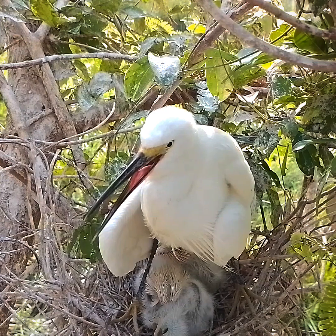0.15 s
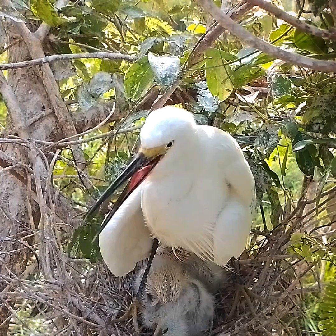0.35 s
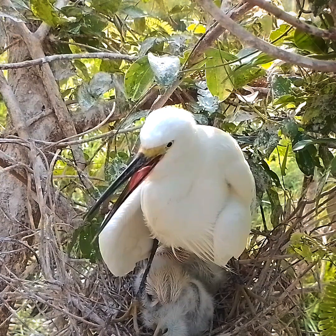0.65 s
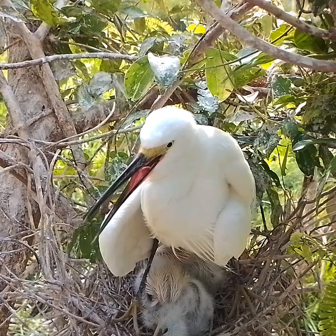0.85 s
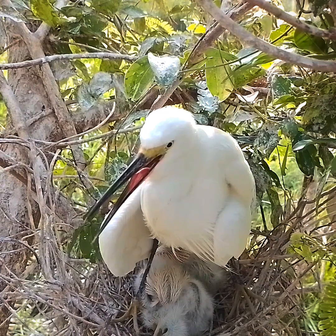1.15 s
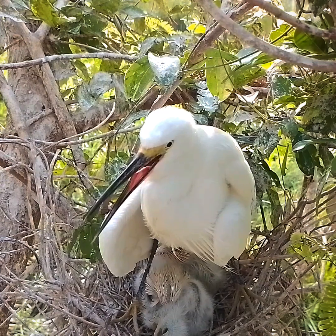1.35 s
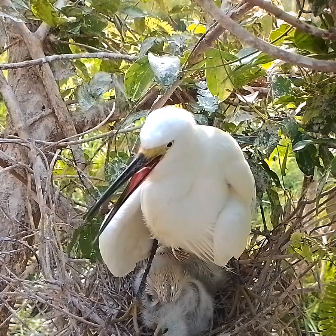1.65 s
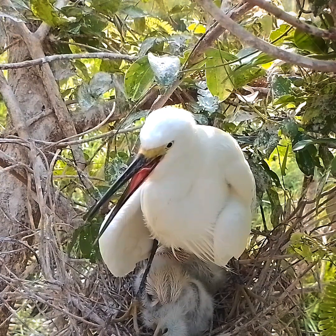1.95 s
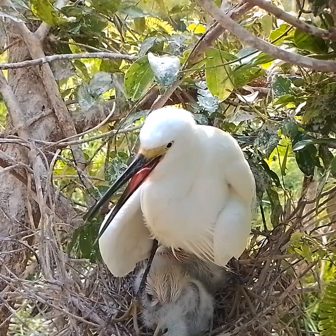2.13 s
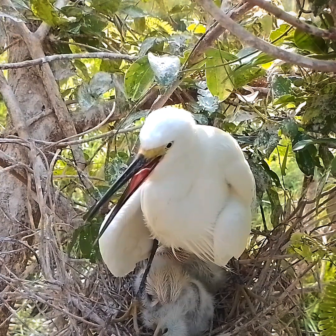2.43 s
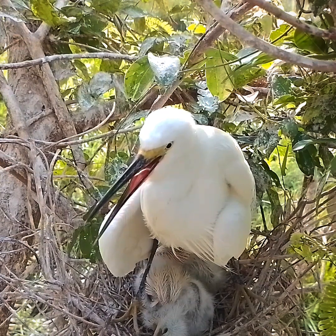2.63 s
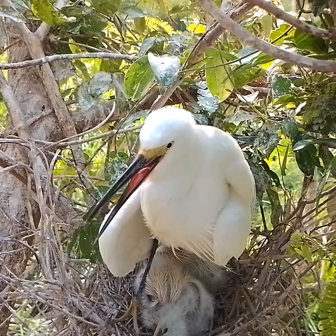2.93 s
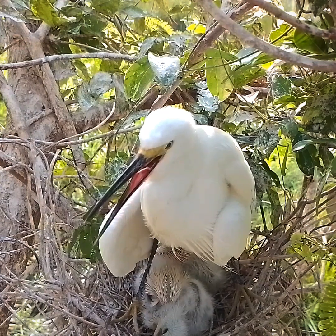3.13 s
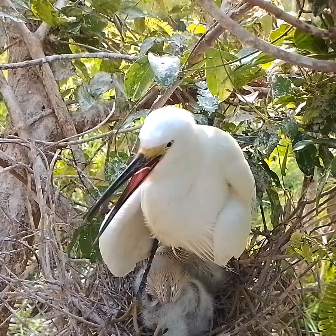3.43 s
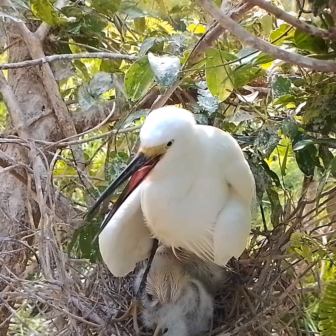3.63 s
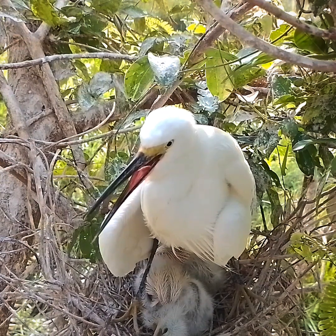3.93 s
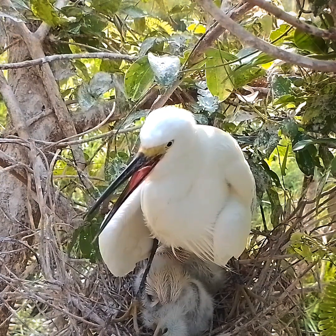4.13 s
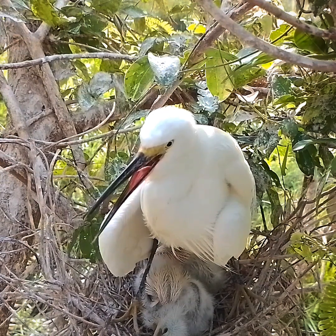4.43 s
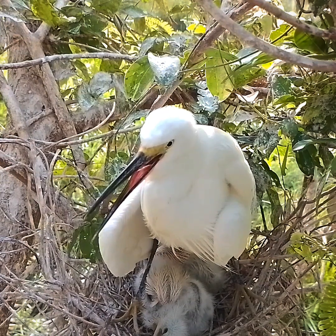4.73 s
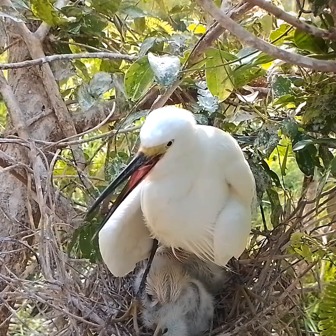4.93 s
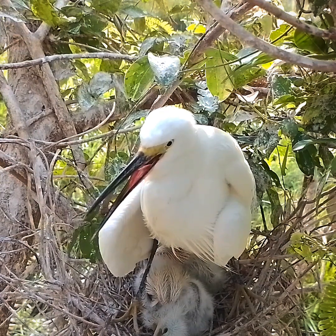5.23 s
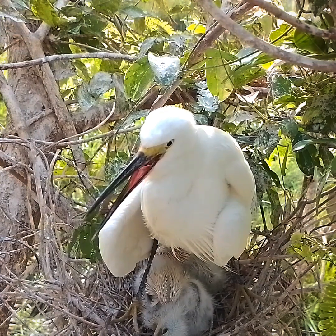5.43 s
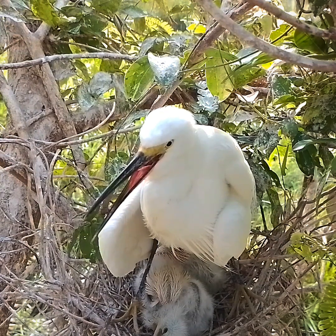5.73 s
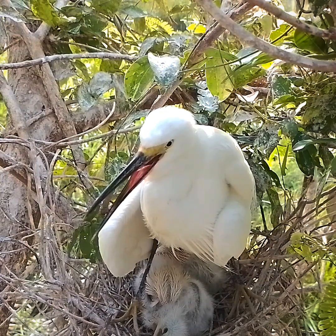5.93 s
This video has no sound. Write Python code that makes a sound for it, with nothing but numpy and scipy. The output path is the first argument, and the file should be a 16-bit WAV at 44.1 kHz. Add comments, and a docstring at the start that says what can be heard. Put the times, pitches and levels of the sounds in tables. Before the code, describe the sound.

Close to a nest in a thicket, young birds make dry clicking chips about two or three times a second, between short raspy begging screeches and puffs of hiss. A few light twig scratches come early, and small peeps and wheezes slip in. Short clucks from neighbouring birds become clearer in the second half, ending with two low croaks. Soft air in the leaves lies underneath.

```python
"""Harsh begging screeches and short ticking chips come from egret chicks in a stick nest among leaves.
Each chip is a train of membrane snaps that rings the throat and trails into a grainy hiss; puffs of
turbulent air excite throat and bill resonances in screeches and rasps. Thin wheezes, peeps and nest
scratches join in, with keks and two croaks from birds further off, over a faint wash of air.
Twigs and trees scatter the calls, and each of two microphone ports has its own treble resonance."""
import sys
import numpy as np
from scipy import signal
from scipy.fft import rfft, irfft, next_fast_len
from scipy.io import wavfile
from scipy.ndimage import uniform_filter1d, map_coordinates

SR = 44100
rng = np.random.default_rng(int(sys.argv[2]) if len(sys.argv) > 2 else 0)


def wav_out(sig):
    """Save sig, one row per channel (or a flat mono array), as 16-bit PCM at SR to the path in sys.argv[1]."""
    wavfile.write(sys.argv[1], SR, np.round(np.clip(np.atleast_2d(sig).T, -1, 1) * 32767).astype(np.int16))


N = 267951
TIME = np.arange(N) / SR
BEG_ATTACK_S, BEG_RELEASE_S = 0.0178, 0.029

# Levels in all tables are relative.
# chips and their hiss: (time [s], level [dB], treble trim [dB], hiss level [dB], hiss length [s])
CHIP_CALLS = [(0.156, -50.5, -1, -74, 0.48), (0.573, -46, 0, -50, 0.05), (0.896, -53, -5, -58, 0.16),
              (1.62, -48.5, 2, -53, 0.42), (1.981, -49, 3, -51, 0.059), (2.301, -49, 5.5, -81, 0.037),
              (2.573, -49.5, 2.5, -49.5, 0.12), (3.054, -41.5, 1.5, -44.5, 0.33),
              (3.305, -43, 6.5, -44, 0.29), (3.55, -44.5, 9.5, -47, 0.23), (4.029, -42.5, 3.5, -53.5, 0.11),
              (4.303, -42, 3.5, -55, 0.15), (4.795, -45, 2.5, -49, 0.43), (5.0767, -45.5, 7, -47, 0.11),
              (5.71, -43.5, 4, -49.5, 0.21), (5.986, -43.5, 2.5, -47, 0.12)]
# short screeches: (start [s], end [s], throat level [dB], hiss level [dB], starting resonance [Hz])
BEGGING_CALLS = [(-0.05, 0.139, -61, -55, 3002), (0.715, 0.879, -69.5, -73, 2999),
                 (1.131, 1.3, -62, -66, 3545), (1.299, 1.604, -61, -57.5, 3212),
                 (1.928, 2.065, -63.5, -59, 3037), (2.612, 2.759, -55.5, -75, 3428),
                 (2.788, 2.931, -60.5, -56, 3223), (3.018, 3.207, -58.5, -50, 2996),
                 (3.232, 3.453, -58, -44, 3416), (4.503, 4.788, -67.5, -55.5, 3106),
                 (4.957, 5.075, -64.5, -62, 3094), (5.291, 5.43, -58.5, -54, 2974),
                 (5.92, 6.105, -54, -77, 3180)]


def chips(length_s, first_db, accent_db, jitter, air, body_db, treble_db):
    """Impulse excitation: a brief train of membrane snaps rings the modes of throat and bill."""
    # lower and upper modes: (frequency [Hz], bandwidth [Hz], level [dB])
    body_modes = [(558, 35.3, 3), (990, 350, -13.5), (2145, 223, 2), (3175, 174, 5.5), (4460, 650, -3)]
    treble_modes = [(6414, 277, 1.5), (7350, 350, -2.5), (10280, 1180, -2)]
    snaps_per_s = 400
    out, size = np.zeros(N), SR // 20
    for s, db, trim_db, *_ in CHIP_CALLS:
        snap_s = np.cumsum(np.r_[0, np.exp(jitter * rng.standard_normal(15))]) / snaps_per_s
        strength = from_db(rng.uniform(-1.8, 1.8, 16)) * np.clip((length_s - snap_s) * snaps_per_s, 0, 1)
        strength[0] *= from_db(first_db)
        strength[rng.integers(2, 5)] *= from_db(accent_db)   # one snap cracks out
        snaps = np.zeros(size)
        snaps[np.minimum(snap_s * SR, size - 1).astype(int)] = strength
        drive = snaps + air * signal.lfilter([1], [1, -.97], snaps) * rng.standard_normal(size)
        # the throat differs a little from chip to chip
        modes = [(hz * np.exp(.028 * rng.standard_normal()), *rest) for hz, *rest in body_modes]
        body = from_db(body_db) * rms_one(resonate(drive, modes))
        treble = from_db(treble_db + trim_db) * rms_one(resonate(drive, treble_modes))
        start = round(s * SR)
        out[start:start + size] += (from_db(db) * (body - treble))[:N - start]
    return in_thicket(out, pan_db=4.5, twigs_db=-3)


def screeches(level_db, waver):
    """Source and filter: rattling air excites throat resonances that sag in each short call."""
    # surges of the one long screech: (time [s], level [dB], resonance [Hz])
    surges = [(0.165, -46.5, 3040), (0.204, -46, 2976), (0.336, -46, 3120), (0.375, -49, 3074),
              (0.435, -43, 2900), (0.48, -48, 2977), (0.527, -42, 2956), (0.557, -51.5, 3080)]
    # throat spectrum at rest: (frequency [Hz], level [dB])
    throat_spectrum = [(300, -46), (2400, -23), (2660, -4.5), (3200, -2), (3450, -20.5), (5600, -23.5),
                       (6400, -18), (7900, -30.5), (8800, -14), (12200, -14.5), (14000, -35.5)]
    rest_hz, sag = 2953, 0.05   # main resonance, and the share by which it falls in a call
    long_db, hz = in_time(surges)
    long_call = from_db(long_db) * held(surges[0][0], surges[-1][0], BEG_ATTACK_S, BEG_RELEASE_S)
    power = from_db(-80.5) ** 2 + long_call ** 2   # faint begging never stops
    for start, end, db, _, from_hz in BEGGING_CALLS:
        call = (from_db(db) * held(start, end, BEG_ATTACK_S, BEG_RELEASE_S)) ** 2
        hz = np.where(call > power, from_hz * np.interp(TIME, [start, end], [1, 1 - sag]), hz)
        power = power + call
    # reading the sound faster or slower shifts all its resonances together
    position = np.cumsum(hz / rest_hz * np.exp(waver * wander(40)))
    rattle = evened(flutter(per_s=240, puff_s=0.0031) * rng.standard_normal(N))
    at_rest = rms_one(colour(rattle, throat_spectrum))
    screech = evened(map_coordinates(at_rest, [position], mode="mirror"))
    envelope = from_db(level_db + wander(60)) * np.sqrt(power)
    return in_thicket(envelope * screech, pan_db=1.0, twigs_db=4.5)


def bill_hiss(level_db, throb_db):
    """Turbulence: puffs of air pass the open bill in each short screech and fade after each chip."""
    # hiss spectrum: (frequency [Hz], level [dB])
    spectrum = [(300, -45.5), (1500, -21), (3200, -1.5), (5500, -7.5), (7300, -8), (8200, -7.5),
                (12000, -1), (14000, -35.5)]
    fade_db_per_s = 16
    power = from_db(-71) ** 2   # faint hiss between calls
    for start, end, _, db, _ in BEGGING_CALLS:
        power = power + (from_db(db) * held(start, end, BEG_ATTACK_S, BEG_RELEASE_S)) ** 2
    for s, *_, db, length_s in CHIP_CALLS:
        fading = from_db(db - fade_db_per_s * np.maximum(TIME - s, 0))
        power = power + (fading * held(s, s + length_s, attack_s=0.0084, release_s=0.0059)) ** 2
    hiss = rms_one(colour(rng.standard_normal(N), spectrum)) * flutter(per_s=230, puff_s=0.0044)
    envelope = from_db(level_db + throb_db * wander(35)) * np.sqrt(power)
    return in_thicket(envelope * hiss, pan_db=1.0, twigs_db=8.5)


def rasps(upper_hz, upper_db):
    """Amplitude modulation: irregular puffs roughen two throat resonances and the hiss of the bill."""
    # rasps: (start [s], end [s], level [dB], lower resonance from [Hz], to [Hz], bill hiss [dB])
    calls = [(1.636, 1.708, -57, 1427, 1507, -7), (3.634, 3.841, -53, 1967, 1626, 2),
             (3.846, 3.91, -53.5, 1844, 1770, -1.5)]
    # bill modes: (frequency [Hz], bandwidth [Hz], level [dB])
    bill_modes = [(2605, 79, 3.5), (6020, 2300, -1.5), (10310, 1800, -14)]
    upper = from_db(upper_db) * evened(gliding_band(upper_hz, width_hz=400))
    bill = rms_one(resonate(rng.standard_normal(N), bill_modes))
    voice = 0
    for start, end, db, *glide_hz, bill_db in calls:
        lower_hz = np.interp(TIME, [start, end], glide_hz) * np.exp(.05 * wander(70))
        lower = evened(gliding_band(lower_hz, width_hz=580))
        # the bill opens slowly, so the upper rattle and the hiss come in late
        opening = np.clip((TIME - start) / min(0.056, (end - start) / 2), 0, 1)
        rasp = lower + opening * (upper + from_db(bill_db) * bill)
        voice = voice + from_db(db) * swell(start, end, edge_s=0.017) * rasp
    return in_thicket(voice * flutter(per_s=290, puff_s=0.004), pan_db=3.5, twigs_db=2.0)


def peeps(waver):
    """Frequency modulation: nearly pure notes slide a little and tremble."""
    # notes: (start [s], end [s], level [dB], pitch from [Hz], to [Hz])
    notes = [(0.643, 0.677, -54, 2805, 2616), (0.856, 0.882, -62, 2720, 2780),
             (2.835, 2.957, -57.5, 3166, 2980), (5.971, 6.097, -53, 3460, 3353)]
    voice, tremble = 0, np.exp(waver * wander(330))
    for start, end, db, *glide_hz in notes:
        phase = 2 * np.pi * np.cumsum(np.interp(TIME, [start, end], glide_hz) * tremble) / SR
        voice = voice + from_db(db) * swell(start, end, edge_s=0.016) * np.sqrt(2) * np.sin(phase)
    return in_thicket(voice, pan_db=1.0, twigs_db=-7)


def wheezes():
    """Narrow-band noise: air whistles unsteadily in one gliding resonance."""
    # wheezes: (start [s], end [s], level [dB], resonance from [Hz], to [Hz], bandwidth [Hz])
    calls = [(1.735, 1.97, -63, 4030, 3970, 160), (1.71, 1.91, -68.5, 4780, 4850, 380),
             (2.615, 2.78, -59, 3600, 3450, 740), (3.238, 3.543, -59.5, 7330, 7174, 590),
             (5.293, 5.584, -69, 7500, 7570, 520)]
    voice = 0
    for start, end, db, *glide_hz, width_hz in calls:
        whistle = evened(gliding_band(np.interp(TIME, [start, end], glide_hz), width_hz))
        voice = voice + from_db(db) * swell(start, end, edge_s=0.014) * whistle
    return in_thicket(voice * from_db(2 * wander(50)), pan_db=4.5, twigs_db=7.0)


def scratches(half_s, width_hz):
    """Damped ringing: quick runs of dry clicks in the nest each excite one broad resonance."""
    # scratches: (time [s], level [dB], resonance [Hz])
    runs = [(0.722, -57.5, 3300), (0.742, -59.5, 4120), (0.802, -65, 3000), (0.935, -51.5, 3930)]
    clicks = pulses(per_s=450, jitter=.5, uneven_db=1)
    out = 0
    for s, db, hz in runs:
        envelope = np.exp(-((TIME - s) / half_s) ** 2)
        out = out + from_db(db) * envelope * rms_one(resonate(clicks, [(hz, width_hz, 0)]))
    return in_thicket(out, pan_db=0, twigs_db=4)


def keks(half_s, spread_db, mode_spread):
    """Formant filtering: bursts of rattling air, each with a throat tuning and length of its own."""
    # keks further off: (time [s], level [dB])
    clear_keks = [(1.085, -65), (1.772, -62), (2.42, -63.5), (2.635, -61), (2.999, -55.5), (3.228, -56.5),
                  (4.108, -55), (4.2, -60.5), (4.378, -52.5), (4.882, -59), (5.13, -53.5), (5.565, -53),
                  (5.79, -60), (5.946, -53)]
    # throat modes: (frequency [Hz], bandwidth [Hz], level [dB])
    formants = [(604, 69, -4.5), (1926, 390, 1.5), (4530, 1700, -4.5)]
    strays_per_s, stray_db = 7, -68.5   # random keks from the rest of the colony
    gaps, strengths = rng.uniform(-1, 1, size=(90, 2)).T
    stray_s = np.cumsum(1 + gaps / 2) / strays_per_s
    calls = clear_keks + list(zip(stray_s, stray_db + spread_db * strengths))
    rattle = flutter(per_s=320, puff_s=0.0013) * rng.standard_normal(N)
    out = np.zeros(N)
    for (s, db), (stretch, *shifts) in zip(calls, rng.uniform(-1.22, 1, size=(len(calls), 4))):
        if s < TIME[-1]:
            near = slice(*np.searchsorted(TIME, [s - 4 * half_s, s + 4 * half_s]))
            modes = [(hz * np.exp(mode_spread * shift), *rest)
                     for (hz, *rest), shift in zip(formants, shifts)]
            envelope = np.exp(-((TIME[near] - s) / (half_s * (1 + stretch / 4))) ** 2)
            out[near] += from_db(db) * envelope * evened(resonate(rattle[near], modes))
    return in_thicket(out, pan_db=4.5, twigs_db=-3)


def croaks(air, level_db):
    """Voicing: reedy pulses drive the throat modes at a pitch that arches up and down."""
    # one contour per croak: (time [s], pitch [Hz], level [dB])
    contours = [
        [(5.352, 299.8, -53.5), (5.385, 365.6, -47.5), (5.408, 323.8, -49), (5.428, 224.4, -47)],
        [(5.8, 255.3, -50.5), (5.822, 324.5, -44.5), (5.848, 356.2, -45), (5.871, 255, -48.5)],
    ]
    # throat modes: (frequency [Hz], bandwidth [Hz], level [dB])
    formants = [(333.4, 200, -3), (690, 190, -0.5), (1050, 130, 2), (1540, 300, 4.5), (2253, 540, 3),
                (5500, 2900, -4.5)]
    pitch, gain = np.full(N, 300.), np.zeros(N)
    for rows in contours:
        hz, db = in_time(rows)
        sounding = (TIME > rows[0][0]) & (TIME < rows[-1][0])
        pitch[sounding], gain[sounding] = hz[sounding], from_db(db[sounding])
    drive = rms_one(pulses(pitch, jitter=.035, uneven_db=3)) + air * rng.standard_normal(N)
    voice = from_db(level_db) * gain * rms_one(resonate(drive, formants))
    return in_thicket(voice, pan_db=-0.5, twigs_db=0.0)


def air_in_leaves(level_db, restless_db, coherent_hz):
    """Diffuse field: a faint outdoor wash, coherent between the ports only in the bass."""
    # spectrum of the wash: (frequency [Hz], level [dB])
    spectrum = [(25, -5.5), (60, 0.5), (115, -5), (160, -19), (260, 1), (950, -5.5), (2000, -6),
                (2900, 2.5), (9400, -6), (11000, 3), (14000, -5.5)]
    low_pass = signal.butter(1, coherent_hz, fs=SR)
    own = rng.standard_normal((2, N))
    shared_bass = signal.lfilter(*low_pass, rng.standard_normal(N))
    wash = own - signal.lfilter(*low_pass, own) + shared_bass
    return from_db(level_db + restless_db * wander(14)) * rms_one(colour(wash, spectrum))


def in_thicket(x, pan_db, twigs_db):
    """Scattering: direct sound is followed by a brief tail from twigs and a longer one from trees."""
    t = TIME[:SR // 2]

    def scatter(t60_s):
        tail = rng.standard_normal((2, len(t))) * from_db(-60 * t / t60_s) * (t > .001)
        return rms_one(tail) / np.sqrt(len(t))

    twigs, trees = scatter(t60_s=0.016), from_db(-1) * scatter(t60_s=0.17)
    response = from_db(twigs_db) * (twigs + trees)
    response[0, 0] += 1
    response[1, 14] += 1   # direct sound reaches the right port 14 samples later
    response *= from_db([[pan_db / 2], [-pan_db / 2]])
    response /= np.sqrt(np.sum(response ** 2) / 2)
    return signal.fftconvolve(x[None], response, axes=1)[:, :N]


def resonate(x, modes):
    """Modal superposition: two-pole resonators in parallel, signs alternating."""
    out = 0
    for k, (hz, width, db) in enumerate(modes):
        r = np.exp(-np.pi * width / SR)
        rung = signal.lfilter([1, 0, -1], [1, -2 * r * np.cos(2 * np.pi * hz / SR), r * r], x + 1e-18)
        out = out + (-1) ** k * from_db(db) * (1 - r * r) / 2 * rung
    return out


def colour(x, points):
    """Minimum-phase filtering by a curve of (frequency [Hz], gain [dB])."""
    size = next_fast_len(N + SR // 4, True) // 2 * 2
    hz, db = np.transpose(points)
    bins = np.maximum(np.arange(size // 2 + 1) * SR / size, 1)
    cepstrum = irfft(np.log(from_db(np.interp(np.log(bins), np.log(hz), db))))
    cepstrum[1:size // 2] *= 2
    cepstrum[size // 2 + 1:] = 0
    return irfft(rfft(x, size) * np.exp(rfft(cepstrum)))[..., :N]


def pulses(per_s, jitter, uneven_db):
    """Jitter and shimmer: one click per cycle, uneven in timing and strength."""
    cycles = np.cumsum(per_s * np.exp(jitter * wander(400))) / SR
    return np.diff(np.floor(cycles), prepend=0) * from_db(uneven_db * rng.standard_normal(N))


def flutter(per_s, puff_s):
    """Pulsed flow: irregular puffs of air, each decaying exponentially; rms 1."""
    r = np.exp(-1 / (puff_s * SR))
    return rms_one(signal.lfilter([1], [1, -r], pulses(per_s, jitter=0.47, uneven_db=1.0) + 1e-18))


def gliding_band(hz, width_hz):
    """Turbulence in one resonance whose centre can move."""
    low_pass = signal.butter(3, width_hz / 2, fs=SR, output="sos")
    slow = signal.sosfilt(low_pass, rng.standard_normal((2, N)))
    phase = 2 * np.pi * np.cumsum(hz * np.ones(N)) / SR
    return rms_one(slow[0] * np.cos(phase) + slow[1] * np.sin(phase))


def held(start, end, attack_s, release_s):
    """Air pressure builds, holds until the end, then decays exponentially."""
    return np.clip((TIME - start) / attack_s, 0, 1) * np.exp(-np.maximum(TIME - end, 0) / release_s)


def swell(start, end, edge_s):
    """Trapezoidal envelope: a call sets in, holds and dies away."""
    return np.clip(np.minimum(TIME - start, end - TIME) / edge_s, 0, 1)


def evened(x):
    """Held air pressure keeps the loudness steady; rms 1."""
    return x / np.sqrt(uniform_filter1d(x ** 2, size=400) + 1e-9)


def wander(per_s):
    """Random drift of rms 1."""
    knots = rng.standard_normal(N // 8)
    return rms_one(np.interp(TIME * per_s, np.arange(len(knots)), knots))


def in_time(rows):
    """Linear interpolation in time, one curve per column."""
    s, *columns = np.transpose(rows)
    return [np.interp(TIME, s, c) for c in columns]


def from_db(db):
    """Decibels to gain."""
    return 10 ** (np.asarray(db) / 20)


def rms_one(x):
    """Scale to unit rms."""
    return x / np.sqrt(np.mean(x ** 2) + 1e-20)


def scene():
    """Superposition of the nest, the neighbours and the air."""
    nest = chips(length_s=0.02165, first_db=-9, accent_db=6.0, jitter=.15, air=0.092,
                 body_db=-4.5, treble_db=-9.0)
    nest += screeches(level_db=-0.14, waver=0.016) + bill_hiss(level_db=-6.5, throb_db=1.5)
    nest += peeps(waver=0.00703) + rasps(upper_hz=3870, upper_db=-2.8) + wheezes()
    nest += scratches(half_s=.011, width_hz=1600)
    neighbours = keks(half_s=0.024, spread_db=9.5, mode_spread=0.092) + croaks(air=0.082, level_db=-0.1)
    return nest + neighbours + air_in_leaves(level_db=-64.0, restless_db=1.5, coherent_hz=493)


def record(dry):
    """Port resonance colours each microphone channel; a steep low-pass cuts the top."""
    # port responses: (frequency [Hz], gain [dB])
    left_port = [(1000, -1), (4000, 3.5), (5600, 1.5), (7100, 13.5), (7750, 16.5), (8200, 8.5), (9300, 4.5),
                 (10300, -15), (14000, -5)]
    right_port = [(4000, 1.5), (5700, -2), (9000, 0), (10000, 6), (11000, 4.5), (13000, -7.5)]
    cutoff_hz = 14100
    ported = np.array([colour(dry[0], left_port), colour(dry[1], right_port)])
    return signal.sosfilt(signal.ellip(10, .2, 80, cutoff_hz, fs=SR, output="sos"), ported)


dry = scene()
out = record(dry)
wav_out(out)
```